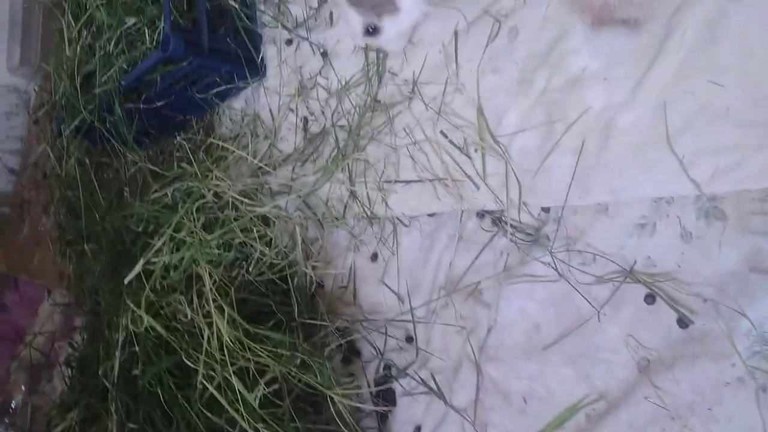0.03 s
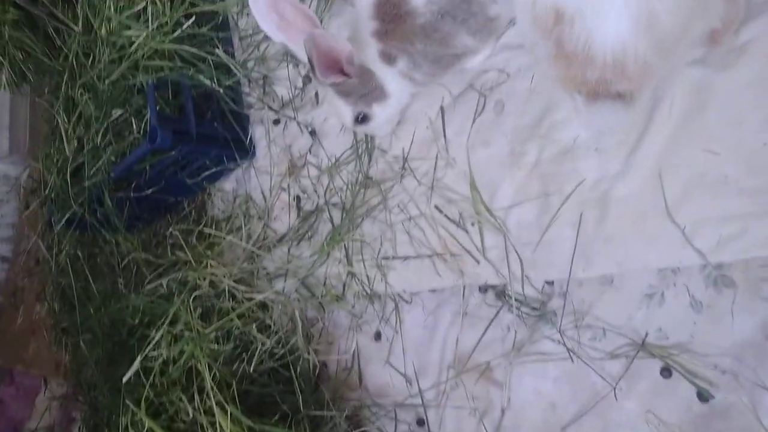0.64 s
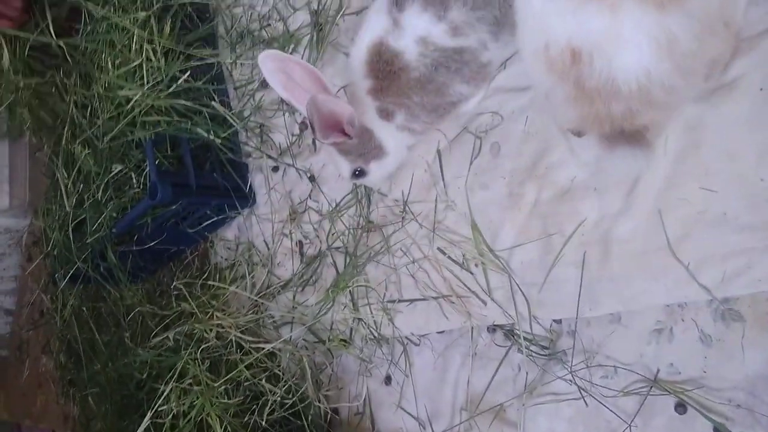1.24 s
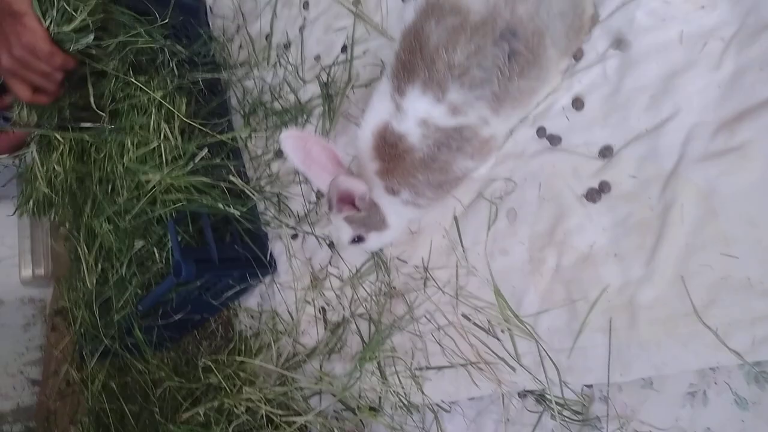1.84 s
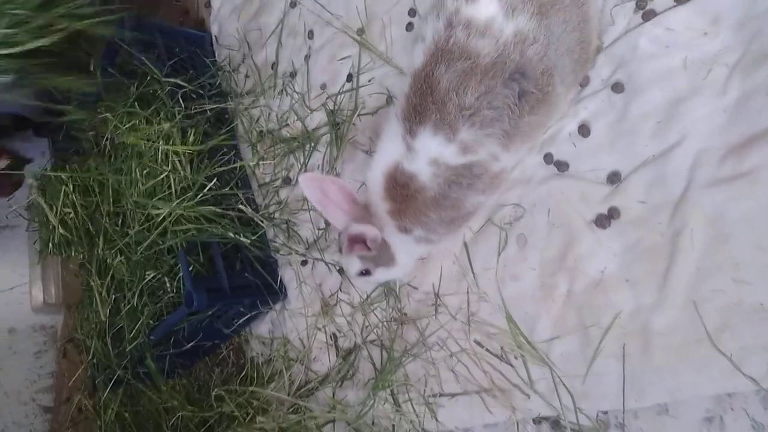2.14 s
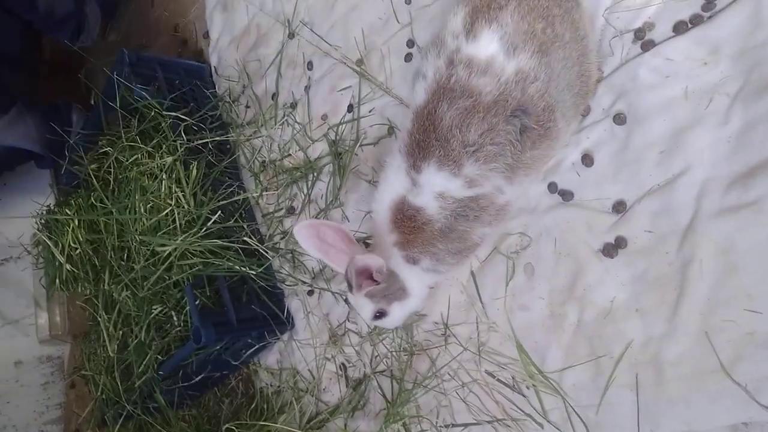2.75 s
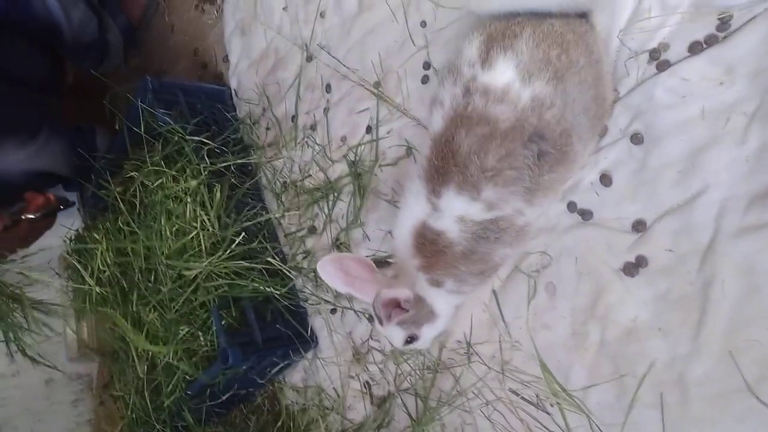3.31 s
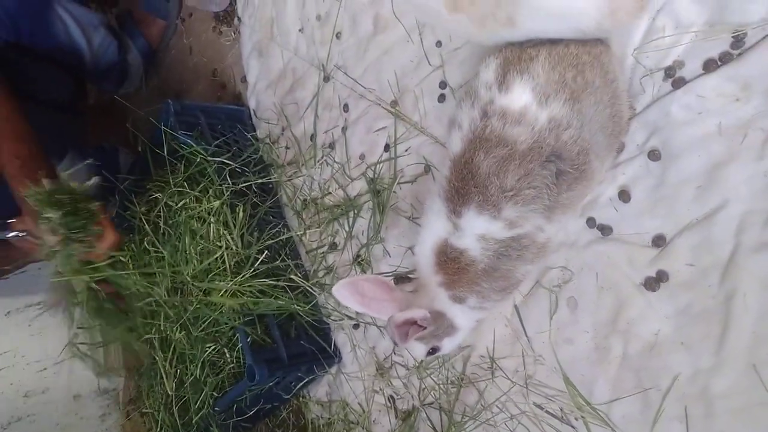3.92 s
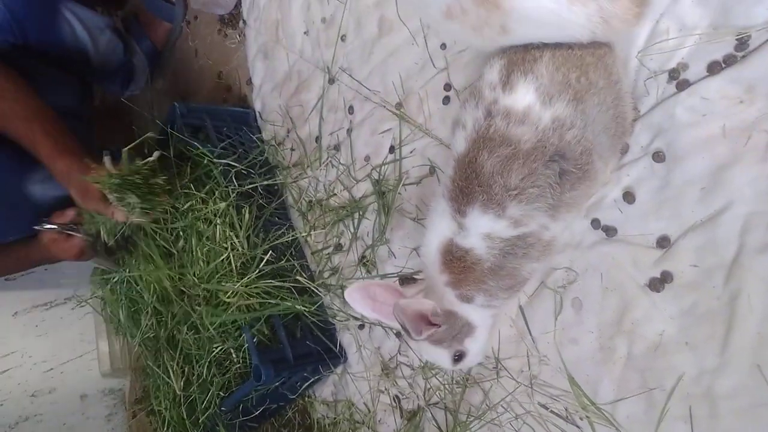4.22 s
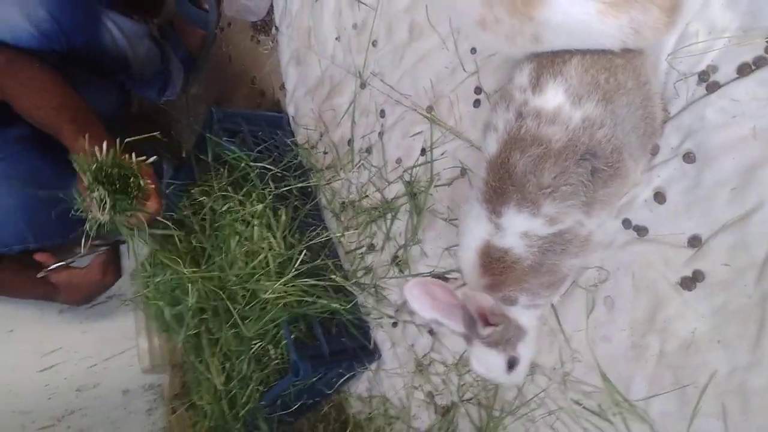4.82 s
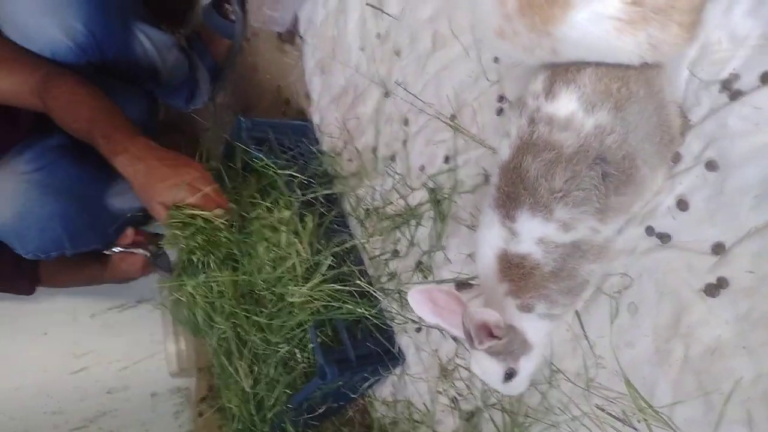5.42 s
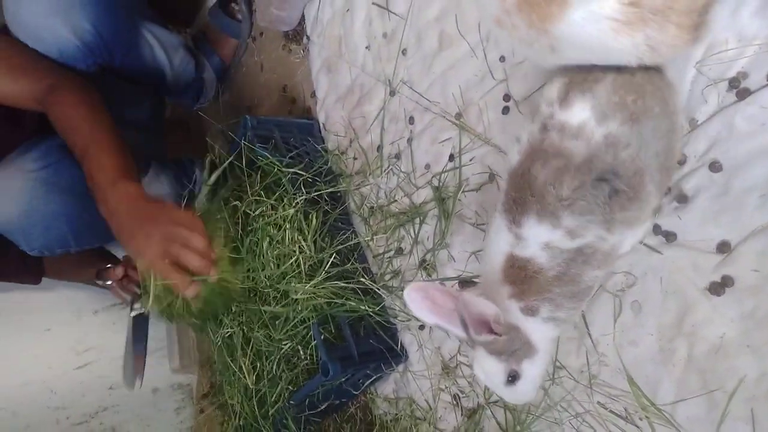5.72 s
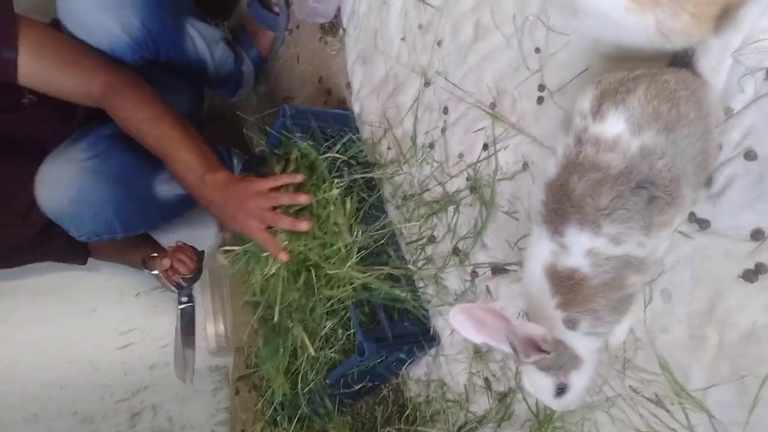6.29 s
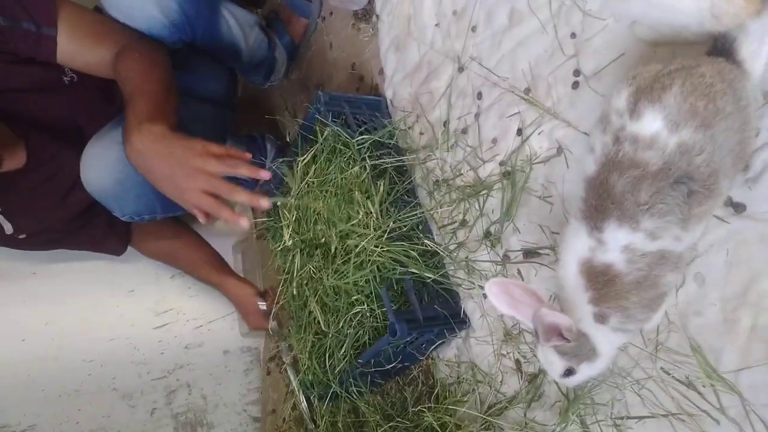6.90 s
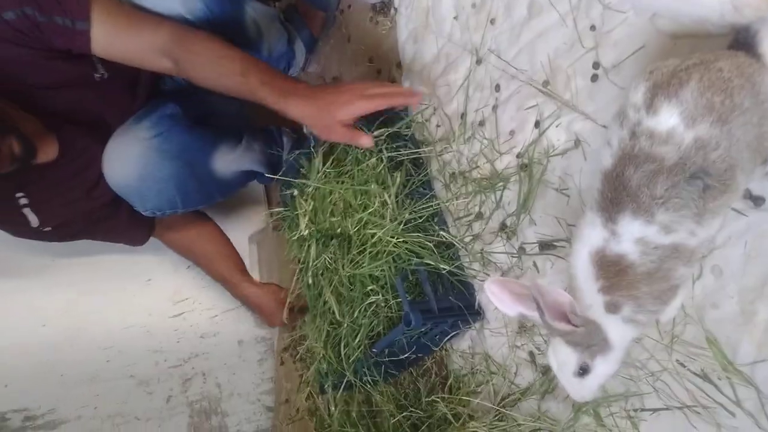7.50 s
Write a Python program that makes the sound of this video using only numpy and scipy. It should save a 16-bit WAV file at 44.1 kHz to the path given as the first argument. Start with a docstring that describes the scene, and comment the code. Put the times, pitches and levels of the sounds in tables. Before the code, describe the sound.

Steel scissors snip crisply three times amid soft rustles of fresh grass and a low outdoor rumble, then scrape on a hard floor.

```python
"""Fresh grass rustles under a hand, over a low outdoor rumble and a far motor that climbs in pitch and fades.
A plastic crate knocks softly and stems snap. Steel scissors shear three bunches, clashing shut and ringing;
the pivot squeaks once and a distant bird chirps twice, faintly. Near the end a low hum swells, clothes
scuff and the scissors chatter over the hard floor.
Rubbing is stick-slip clicks, coloured or driving steel modes; the walled porch adds a short wash."""
import sys
import numpy as np
from scipy import signal
from scipy.fft import rfft, irfft, next_fast_len
from scipy.io import wavfile

SR = 44100
rng = np.random.default_rng(int(sys.argv[2]) if len(sys.argv) > 2 else 0)


def output_pcm(signal):
    """Save a mono or channel-first signal as 16-bit PCM at the path in sys.argv[1].

    Samples are clipped to [-1, 1] before scaling.
    """
    pcm = np.clip(np.atleast_2d(signal).T, -1, 1) * 32767
    wavfile.write(sys.argv[1], SR, np.round(pcm).astype(np.int16))


N = 332955
TIME = np.arange(N) / SR
FREQ = np.maximum(np.fft.rfftfreq(N, 1 / SR), 1)

# spectrum of rubbing grass: (frequency [Hz], level [dB])
GRASS_SPECTRUM = [(900, -24), (1600, -19), (2900, -15), (3800, -11), (4700, -9.5), (5600, -8), (7000, -1),
                  (8800, 1.5), (10500, -3), (11800, -7.5), (14300, -10), (15000, -45.5)]


def amp(db):
    """Decibels to gain."""
    return 10 ** (np.asarray(db) / 20)


def unit(x):
    """Scale to rms 1."""
    return x / np.sqrt(np.mean(x ** 2))


def gains(spectrum):
    """Gain at each FREQ from (frequency [Hz], level [dB]) points."""
    hz, db = np.transpose(spectrum)
    return amp(np.interp(np.log(FREQ), np.log(np.maximum(hz, 1)), db))


def colour(x, spectrum):
    """Give white sound a spectrum, keeping its power."""
    size = next_fast_len(N + 4096, True)
    shape = np.interp(np.fft.rfftfreq(size, 1 / SR), FREQ, unit(gains(spectrum)))
    return irfft(rfft(x, size) * shape, size)[..., :N]


def follow(curve):
    """Join (time [s], value) points by straight lines."""
    return np.interp(TIME, *np.transpose(curve))


def wander(rate_hz):
    """Smooth random curve, rms 1."""
    return unit(np.interp(TIME * rate_hz, np.arange(4096), rng.standard_normal(4096)))


def clicks(rate_hz, spread_db):
    """Random impulses of uneven size, rms 1."""
    size = amp(spread_db * np.clip(rng.standard_normal(N), -2, 2))
    return unit((rng.random(N) < rate_hz / SR) * size * rng.choice([-1, 1], N))


def add(track, at_s, sound):
    """Mix a sound into a track."""
    start = int(at_s * SR)
    part = sound[..., :max(N - start, 0)]
    track[..., start:start + part.shape[-1]] += part


def porch(x, wet_db, t60_s, lag_samples=14):
    """Direct sound, later on the left, plus a short wash from floor and walls."""
    t = TIME[:SR // 2]
    wash = rng.standard_normal((2, len(t))) * amp(-60 * t / t60_s) * (1 - np.exp(-t / 0.0023))
    response = amp(wet_db) * unit(wash) / np.sqrt(len(t))
    response[[0, 1], [lag_samples, 0]] += 1
    return signal.fftconvolve(np.atleast_2d(x), response / np.hypot(1, amp(wet_db)), axes=1)[:, :N]


def pressure(t, length_s, rise_share, release_s):
    """Envelope of one push: linear rise, hold, exponential release."""
    return np.minimum(t / (rise_share * length_s), 1) * np.exp(-np.maximum(t - length_s, 0) / release_s)


def gestures(moves, rise_share, release_s=0.052):
    """Envelope of (time [s], length [s], level [dB]) movements; their powers add."""
    power = np.zeros(N)
    for at_s, length_s, db in moves:
        power += (amp(db) * pressure(np.maximum(TIME - at_s, 0), length_s, rise_share, release_s)) ** 2
    return np.sqrt(power)


def grass_rustle():
    """Countless leaves flick past each other, with a sparser crackle of stiff stalks."""
    # hand pushing, gathering, spreading: (time [s], length [s], level [dB])
    handfuls = [(-0.05, 0.14, -60), (.24, .17, -61), (.445, 0.089, -54.5), (.65, 0.072, -61),
                (.92, 0.13, -60.5), (1.2, 0.11, -63), (1.32, 0.12, -54), (1.55, 0.074, -54),
                (1.85, 0.14, -66.5), (2.33, 0.22, -64), (2.6, 0.21, -62.5), (3.18, .08, -66),
                (3.3, 0.35, -58.5), (3.73, 0.088, -55.5), (3.8, 0.14, -55), (4.15, 0.3, -70),
                (5.82, 0.25, -61), (5.98, 0.34, -57), (6.4, 0.15, -53), (6.66, 0.14, -61),
                (6.995, 0.03, -59), (7.08, 0.15, -63.5)]
    # faint stir of the heap between handfuls: (time [s], level [dB])
    stir = [(0, -68.5), (.85, -65.5), (1.17, -70), (2.0, -67), (2.2, -69), (3.05, -71.5), (4.0, -61.5),
            (4.75, -74), (5.05, -89.5), (5.2, -67.5), (5.8, -66), (6.6, -63), (6.95, -75.5), (7.55, -61)]
    effort = np.hypot(gestures(handfuls, rise_share=0.52), amp(follow(stir))) * amp(1.1 * wander(45))
    leaves = np.array([clicks(12000, spread_db=3.1) for ear in range(2)])
    stalks = amp(-8) * clicks(90, spread_db=3)
    crackle = porch(colour(stalks * effort, GRASS_SPECTRUM), wet_db=-1, t60_s=0.11)
    return colour(leaves * effort, GRASS_SPECTRUM) + crackle


def outdoor_air():
    """A swelling rumble common to both ears, and a faint wide hiss."""
    # still air: (frequency [Hz], level [dB])
    rumble_spectrum = [(14, -8), (22, 4.5), (30, 6.5), (40, -11.5), (55, -9.5), (85, -18.5), (115, -13.5),
                       (200, -24), (320, -27.5), (450, -32), (700, -33), (1200, -40), (3000, -42),
                       (4500, -79.5)]
    # swell below 70 Hz: (time [s], gain [dB])
    swell = [(0, -3.5), (1.5, -1.5), (2.4, -2.5), (3.3, -0.5), (4, 0.5), (5.2, 4.5), (5.8, 1), (6.7, 0.5),
             (7.5, -4)]
    # (frequency [Hz], level [dB])
    hiss_spectrum = [(30, 23), (150, 6.5), (500, 1), (1500, -3), (3000, -4.5), (6000, -5.5), (14000, -8)]
    noise = colour(rng.standard_normal(N), rumble_spectrum)
    bass = signal.sosfiltfilt(signal.butter(2, 70, fs=SR, output="sos"), noise)
    rumble = noise - bass + bass * amp(follow(swell))
    hiss = colour(rng.standard_normal((2, N)), hiss_spectrum)
    return amp(-66.5) * rumble + amp(-74) * hiss


def motor_and_hum():
    """A far motor's lowest two harmonics climb in pitch and fade; a low hum swells near the end."""
    # (time [s], pitch [Hz])
    pitch = [(0, 65), (.55, 66.5), (.8, 70), (1.2, 72.2), (2.3, 81), (3.0, 84), (3.6, 90), (4.8, 96),
             (6.6, 62.1)]
    # fundamental: (time [s], level [dB])
    level = [(0, -70.5), (.55, -74), (.8, -63), (1.03, -75), (1.22, -63), (1.55, -63.5), (1.75, -78),
             (1.93, -64), (2.3, -74.5), (3.0, -76), (3.7, -75), (4.8, -83.5), (6.6, -79.5), (7.55, -66)]
    pitch_hz = follow(pitch) * (1 + 0.0041 * wander(2.1))
    phase = 2 * np.pi * np.cumsum(pitch_hz) / SR
    gain = np.sqrt(2) * amp(follow(level) + 0.46 * wander(8))
    return gain * (np.sin(phase) + amp(-16) * np.sin(2 * phase))


def crate_knocks():
    """Each knock is a dull push plus a few cycles of a plastic wall."""
    # (time [s], level [dB], wall ring [Hz])
    knocks = [(0.221, -63.5, 1230), (0.249, -61, 2960), (0.589, -60.5, 1080), (0.734, -55.5, 1620),
              (0.732, -68, 3670), (0.961, -53.5, 1170), (2.420, -63, 701), (3.402, -64, 1410),
              (6.133, -40, 1610)]
    track, t = np.zeros(N), TIME[:SR // 20]
    body = amp(-13.5) * np.sin(2 * np.pi * 330 * t) * np.exp(-t / 0.0023)
    for at_s, db, hz in knocks:
        wall = np.sin(2 * np.pi * hz * t) * np.exp(-t / 0.0013)
        add(track, at_s, amp(db) * (wall + body))
    return porch(track, wet_db=-5.5, t60_s=0.1, lag_samples=3)


def stem_snaps():
    """A breaking stem gives a dry tick that rings for a few cycles."""
    # (time [s], level [dB])
    snaps = [(0.263, -55.5), (0.332, -53), (0.4642, -47.5), (0.4712, -45.5), (0.669, -57.5), (0.702, -53),
             (0.7382, -48.5), (1.416, -46), (1.421, -47), (1.582, -50.5), (1.616, -47.5), (3.78, -50.5),
             (3.92, -49), (4.0174, -48), (4.9733, -58)]
    track, t = np.zeros(N), TIME[:256]
    band = signal.iirpeak(9200, Q=1.3, fs=SR)
    for at_s, db in snaps:
        crack = rng.standard_normal(len(t)) * np.exp(-t / 0.0007)
        tick = signal.lfilter(*band, signal.lfilter(*band, crack))
        add(track, at_s, amp(db) * unit(tick))
    return porch(track, wet_db=-3, t60_s=0.08)


def stick_slip(strokes, slips, rise_share, release_s, focus_db=0, focus_width_hz=1700):
    """One (time [s], run of slips) per stroke; the contact point favours one band of the steel."""
    runs, t = [], TIME[:8192]
    hz = np.fft.rfftfreq(len(t), 1 / SR)
    octaves = np.log2(np.maximum(hz, 2000) / 8000)
    for k, (at_s, length_s, db, tilt_db_oct, focus_hz) in enumerate(strokes):
        pressed = slips[k * len(t):(k + 1) * len(t)] * pressure(t, length_s, rise_share, release_s)
        run = unit(pressed) * np.sqrt(length_s / t[-1])
        tone_db = tilt_db_oct * octaves + focus_db / (1 + ((hz - focus_hz) / focus_width_hz) ** 2)
        runs.append((at_s, amp(db) * irfft(rfft(run) * amp(tone_db))))
    return runs


def ring(force, modes):
    """Drive steel modes; each reaches the two ears a quarter cycle apart."""
    t = TIME[:SR // 8]
    ear_phase = np.array([[np.pi / 4], [-np.pi / 4]])
    response = np.zeros((2, len(t)))
    for k, (hz, width_hz, db) in enumerate(modes):
        decay = amp(db) * np.sqrt(width_hz) * np.exp(-np.pi * width_hz * t)
        response += decay * np.sin(2 * np.pi * hz * t + (-1) ** k * ear_phase)
    response *= 1 - np.exp(-t / 0.00012)
    return signal.oaconvolve(force[None], unit(response) / np.sqrt(len(t)), axes=1)[:, :len(force)]


def scissor_cuts():
    """Edges shear the stems, which damp them, then clash and ring; the grip retunes them slightly."""
    # blades meeting: (time [s], clash length [s], level [dB], tilt [dB/oct], focus [Hz],
    # shear lead [s], catch delay [s], catch gain [dB])
    cuts = [(1.743, 0.0068, -23, 2, 8770, .036, .013, -8.5),
            (4.0468, .008, -27.5, 2, 6240, 0.046, .014, -6),
            (5.395, 0.018, -30, 5, 7170, 0.013, 0.017, -2.5)]
    # light strokes without a clash: (time [s], length [s], level [dB], focus [Hz])
    openings = [(4.747, 0.031, -57.5, 7060), (5.225, 0.012, -39.5, 7200), (5.343, 0.027, -61, 7900),
                (5.628, 0.019, -55.5, 7800)]
    # rubbing edges, broad knock of blades and handles: (frequency [Hz], level [dB])
    edge_spectrum = [(300, -54), (1100, -48.5), (1620, -21.5), (2000, -12), (2480, -5), (3000, -22.5),
                     (3550, -7.5), (5000, -2.5), (6500, 2.5), (9000, 6), (11000, 0.5), (12500, -6),
                     (13600, -6), (14200, -14)]
    # finger-damped blades: (frequency [Hz], width [Hz], level [dB])
    blade_modes = [(1613, 160, -11), (1753, 110, -9), (2493, 65, -2.5), (3304, 100, -6.5), (3640, 46, -19),
                   (4120, 50, -4.5), (4513, 53, -6.5), (5020, 48, -6), (5350, 60, -11), (5430, 42, 0.5),
                   (6550, 32, 3), (7360, 59, -3.5), (8100, 50, -13.5), (7500, 18, 3), (8010, 40, 3),
                   (8470, 35, -13), (8500, 45, -22), (8850, 28, -5), (9330, 50, -28), (9900, 44, -11),
                   (10970, 42, -2), (11360, 33, -2.5), (12500, 50, -21), (13100, 35, -10.5),
                   (14400, 50, -21.5)]
    catch_s, rub_s = 0.0067, 0.026
    shears, contacts = [], []
    for at_s, length_s, db, tilt_db_oct, focus_hz, lead_s, delay_s, catch_db in cuts:
        shears.append((at_s - lead_s, lead_s, db - 19, -0.5, 8200))
        clash = (at_s, length_s, db, tilt_db_oct, focus_hz)
        tip_catch = (at_s + delay_s, catch_s, db + catch_db, tilt_db_oct - 1.5, 8700)
        rub_to_stop = (at_s + delay_s + catch_s, rub_s, db - 28, -4, 9260)
        contacts += [clash, tip_catch, rub_to_stop]
    contacts += [(at_s, length_s, db, 0.3, focus_hz) for at_s, length_s, db, focus_hz in openings]
    stalks, edges, blades = np.zeros(N), np.zeros(N), np.zeros((2, N))
    for at_s, run in stick_slip(shears, clicks(3800, spread_db=2.5), rise_share=0.36, release_s=0.003):
        add(stalks, at_s, run)
    grips = rng.standard_normal((len(contacts), len(blade_modes), 2))
    slips = clicks(4000, spread_db=3.3)
    runs = stick_slip(contacts, slips, rise_share=0.45, release_s=0.0017, focus_db=6)
    for (at_s, run), grip in zip(runs, grips):
        modes = [(hz * (1 + 0.008 * detune), width_hz, db + 2 * hold)
                 for (hz, width_hz, db), (detune, hold) in zip(blade_modes, grip)]
        add(edges, at_s, run)
        add(blades, at_s, ring(run, modes))
    grinding = amp(-2) * colour(edges, edge_spectrum) + colour(stalks, GRASS_SPECTRUM)
    return porch(grinding, wet_db=-0.32, t60_s=0.19) + porch(amp(-8) * blades, wet_db=0.5, t60_s=0.26)


def chirps_and_squeak():
    """Two faint, rising, distant chirps and a brief pivot squeak: noise bands swell, glide and fade."""
    # first and last rows chirps, middle two the pivot:
    # (time [s], length [s], start [Hz], end [Hz], width [Hz], level [dB])
    glides = [(2.043, 0.14, 3440, 4490, 1405, -74.5), (4.608, 0.03, 4620, 4800, 400, -69),
              (4.617, 0.032, 6510, 6560, 199, -67.5), (7.025, 0.15, 3610, 4250, 1414, -72.5)]
    track = np.zeros(N)
    for at_s, length_s, start_hz, end_hz, width_hz, db in glides:
        t = TIME[:int(length_s * SR)]
        tone = np.sin(2 * np.pi * np.cumsum(np.linspace(start_hz, end_hz, len(t))) / SR)
        arch = np.sin(np.pi * t / length_s)
        add(track, at_s, amp(db) * unit(arch * wander(width_hz)[:len(t)] * tone))
    return porch(track, wet_db=9.4, t60_s=0.2)


def clothes():
    """Dull cloth friction over the thud of the shifting body."""
    # (time [s], length [s], level [dB])
    scuffs = [(6.52, 0.013, -63.5), (6.71, 0.044, -65.5), (6.77, 0.13, -75), (6.99, 0.039, -60.5),
              (7.19, 0.017, -62), (7.29, .11, -59), (7.44, 0.047, -52)]
    # (frequency [Hz], level [dB])
    cloth_spectrum = [(60, -18), (140, 4.5), (200, -2.5), (350, 4), (520, -5), (1000, -7), (1600, -15),
                      (4000, -5.5), (9000, -22)]
    effort = gestures(scuffs, rise_share=0.43)
    rub = colour(clicks(3000, spread_db=2.94), cloth_spectrum) * effort
    body_band = signal.iirpeak(75.6, Q=1.5, fs=SR)
    thud = unit(signal.lfilter(*body_band, rng.standard_normal(N))) * effort
    return porch(rub, wet_db=-5, t60_s=0.41, lag_samples=5) + amp(-8.5) * thud


def scissor_slide():
    """Steel chatters over the floor, brighter when pressed harder, and rings in narrow modes."""
    # short pushes: (time [s], length [s], level [dB])
    drags = [(7.321, 0.041, -48.5), (7.351, 0.042, -42), (7.379, 0.036, -39.5), (7.405, 0.061, -41.5),
             (7.458, .09, -32.5), (7.488, .024, -27)]
    # steel tapping the floor: (time [s], level [dB])
    taps = [(7.3513, -38), (7.478, -19), (7.5125, -37), (7.5212, -34), (7.540, -37)]
    # freely ringing scissors: (frequency [Hz], level [dB])
    free_modes = [(2380, -34), (2950, -10), (3640, -15), (4150, -8), (4230, -7.5), (4480, -6.5),
                  (4560, -16), (5566, 1.5), (6401, -30), (7079, -31), (7397, 4), (7848, 4.5), (8115, 2),
                  (8340, -22), (8516, -1), (8565, 6), (8796, -17), (9227, -16), (9582, 2.5), (9652, -3),
                  (10320, -17), (10815, -3), (11154, -8), (11628, -13), (12527, -16), (12769, -4),
                  (13555, -9), (13948, -30)]
    # grating, with broad resonances of the pressed blades: (frequency [Hz], level [dB])
    grit_spectrum = [(1200, -26.5), (2400, -3), (2950, -56), (3400, -33), (4400, -4), (4950, -17),
                     (5580, 4), (6100, -0.5), (7600, 1), (10800, -1.5), (11950, -12), (12750, -11),
                     (13300, -15), (14300, -39)]
    tap_s, focus_hz, mode_width_hz = 0.0024, 9630, 14
    contacts = []
    for at_s, length_s, db in drags + [(at_s, tap_s, db) for at_s, db in taps]:
        tilt_db_oct = 2 + 0.26 * (db + 43)
        contacts.append((at_s, length_s, db, tilt_db_oct, focus_hz))
    force, slips = np.zeros(N), clicks(2400, spread_db=4.6)
    runs = stick_slip(contacts, slips, rise_share=0.21, release_s=0.0015, focus_db=3, focus_width_hz=320)
    for at_s, run in runs:
        add(force, at_s, run)
    steel = ring(force, [(hz, mode_width_hz, db) for hz, db in free_modes])
    grating = porch(colour(force, grit_spectrum), wet_db=1, t60_s=0.25, lag_samples=5)
    return amp(-4) * grating + amp(-0.5) * steel


def scene():
    """All sources, in stereo."""
    bright = grass_rustle() + stem_snaps() + scissor_cuts() + chirps_and_squeak() + scissor_slide()
    return bright + crate_knocks() + clothes() + motor_and_hum() + outdoor_air()


def record(dry):
    """Two microphone ports of slightly different colour, and a steep top cut."""
    # left minus right: (frequency [Hz], level [dB])
    balance = [(100, 0), (400, -2), (1200, -0.5), (3000, 0), (5500, 0.5), (7500, -3.5), (9500, 3),
               (11000, 7), (14000, -1)]
    lean = np.sqrt(gains(balance))
    port_gains = np.repeat([lean, 1 / lean], 2, axis=1)[:, :N + 1]
    ports = irfft(rfft(dry, 2 * N) * port_gains, 2 * N)[:, :N]
    top_cut = signal.ellip(10, 0.2, 85, 14450, fs=SR, output="sos")
    return signal.sosfilt(top_cut, ports)


dry = scene()
out = record(dry)
output_pcm(out)
```